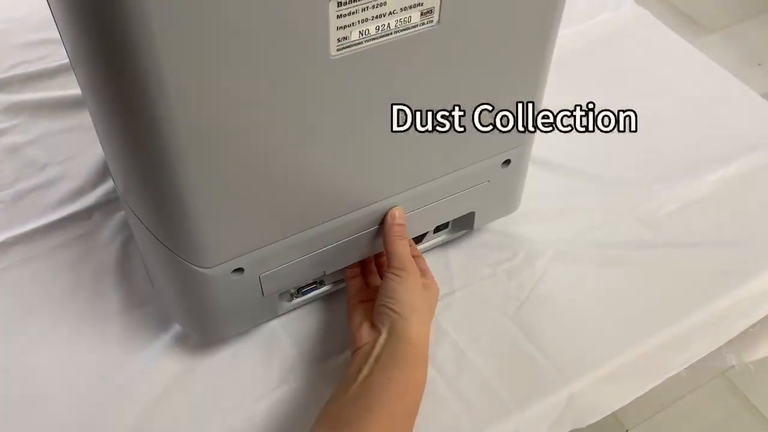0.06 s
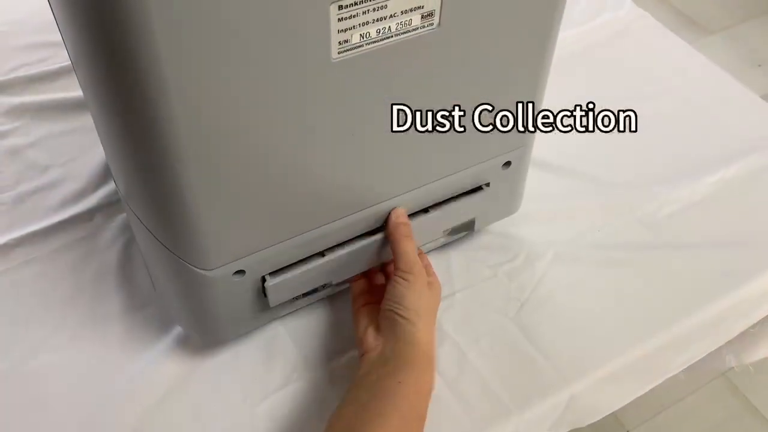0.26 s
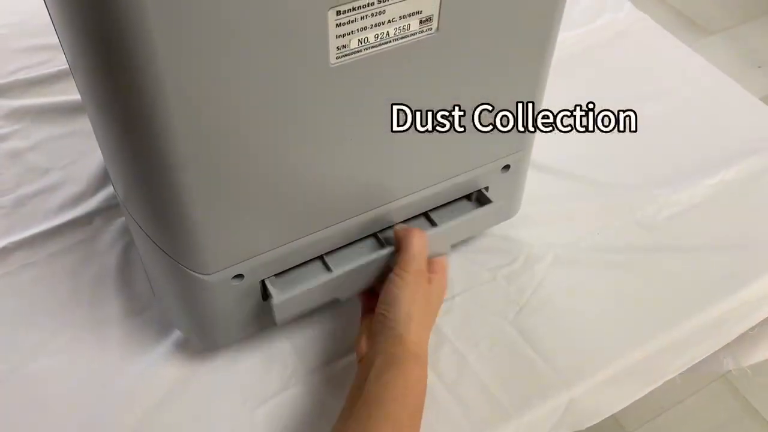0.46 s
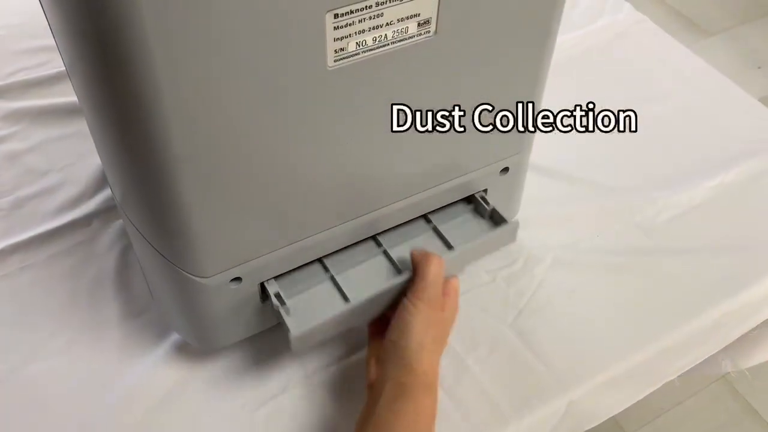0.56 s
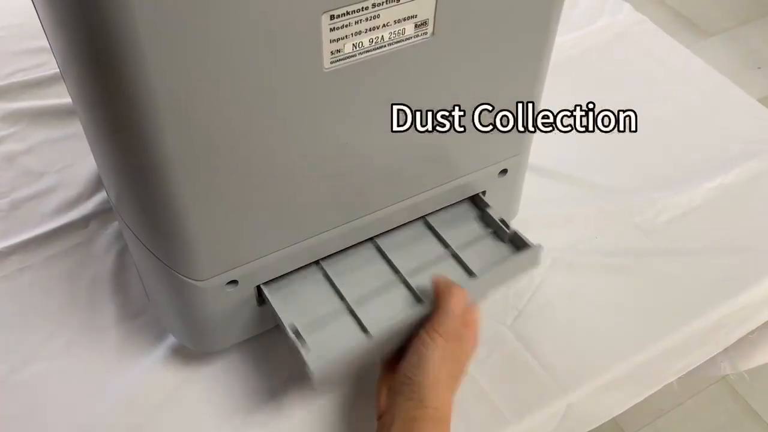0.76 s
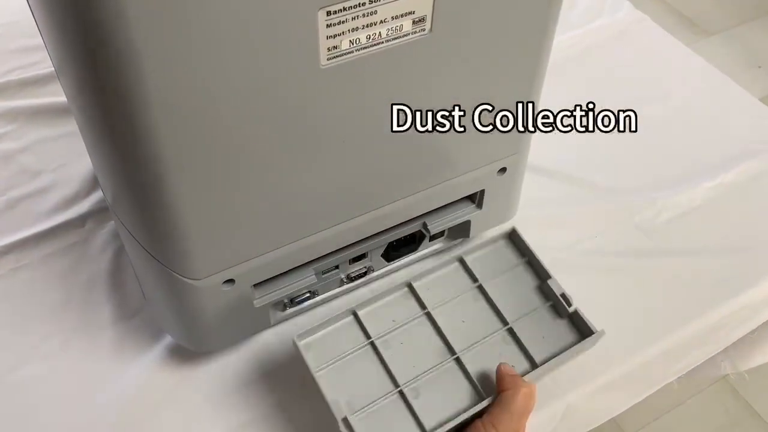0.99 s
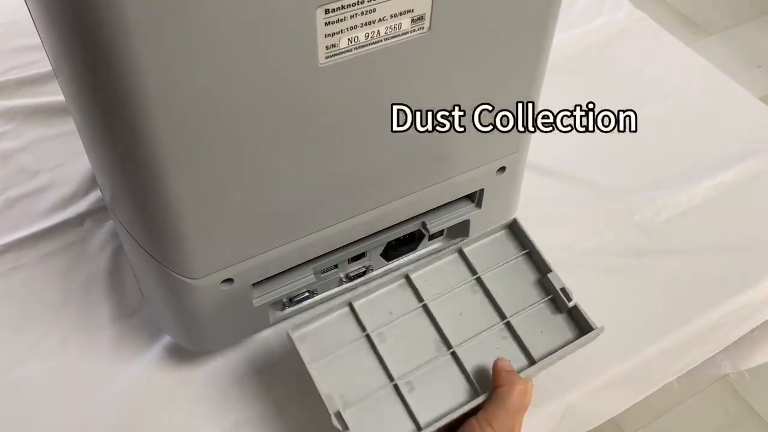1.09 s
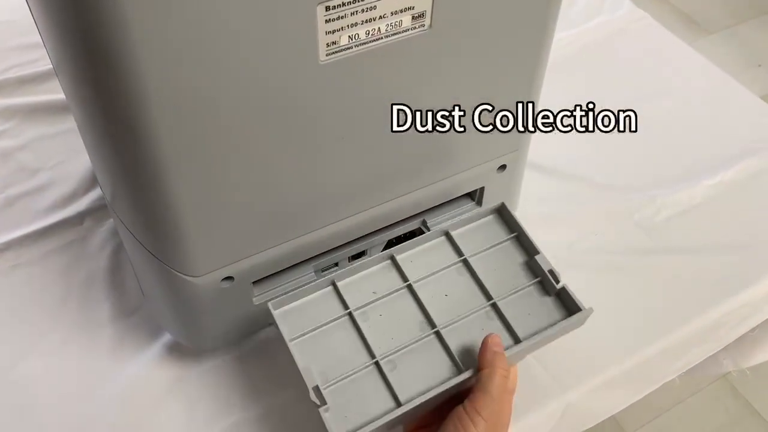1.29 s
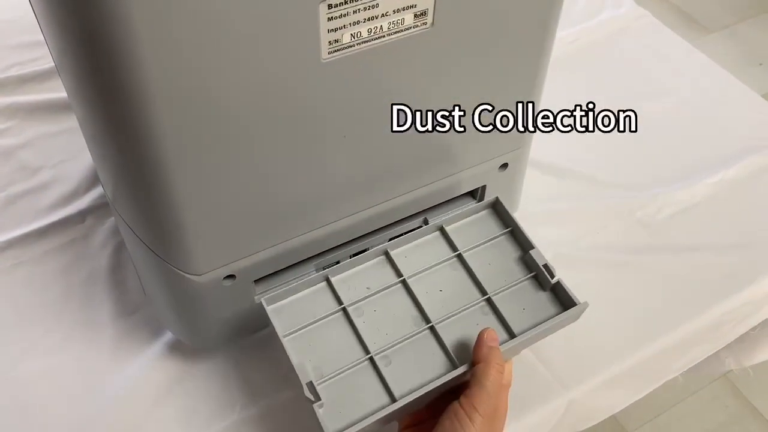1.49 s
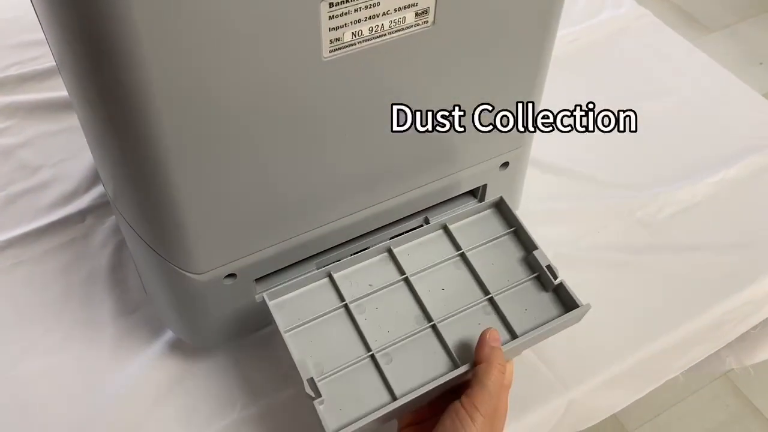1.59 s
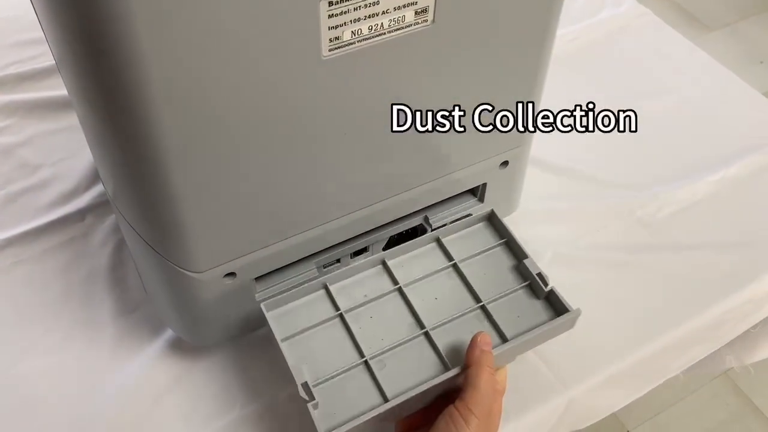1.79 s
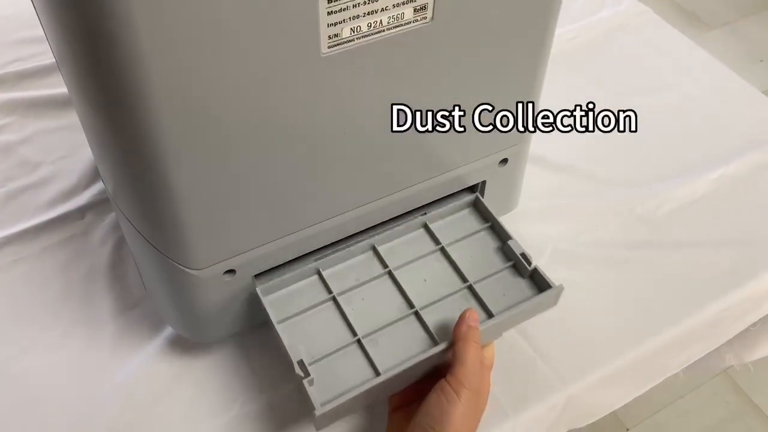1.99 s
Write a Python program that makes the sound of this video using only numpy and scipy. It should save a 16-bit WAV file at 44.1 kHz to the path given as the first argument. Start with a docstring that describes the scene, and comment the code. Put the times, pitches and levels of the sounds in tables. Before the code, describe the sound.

In a quiet room, one microphone picks up a plastic tray clicking free and scraping along its guides with a few hollow knocks. Light ticks and a soft bump follow over a low ventilation rumble.

```python
"""A ribbed plastic tray is drawn out of a machine's base, heard on one microphone in a quiet room.
Ventilation rumbles from the start. At 0.2 s the catch snaps; the tray then knocks and scrapes along
its guides, and the shell's resonances shift as it travels. Free by 0.8 s, it ticks lightly in the hand,
each contact trailed by a short room tail. At 1.5 s comes one soft low bump, then only the ventilation."""
import sys
import numpy as np
from scipy import signal
from scipy.fft import rfft, irfft
from scipy.io import wavfile

SR = 44100
rng = np.random.default_rng(int(sys.argv[2]) if len(sys.argv) > 2 else 0)


def unload_wav(signal):
    """Save mono or channel-first audio to the path in sys.argv[1] as 16-bit WAV at rate SR, clipped to [-1, 1]."""
    wavfile.write(
        sys.argv[1],
        SR,
        np.round(np.clip(np.atleast_2d(signal).T, -1, 1) * 32767).astype(np.int16),
    )


N = 90404
TIME, FREQS_HZ = np.arange(N) / SR, np.fft.rfftfreq(N, 1 / SR)
BAND_EDGES_HZ = 70 * 2 ** np.arange(0, 7.9, 1 / 3)
PIVOT_HZ = 1000  # brightness tilts turn about this pitch
LATCHED_S, HALF_OUT_S, AT_LIP_S = 0.29, 0.41, 0.76  # the tray's travel

# tray striking the housing: start_s, level_db, tilt_db_per_octave, ring_ratio, spot_hz, spot_db
KNOCKS = [(0.2209, -15.5, 1.5, 1.0, 2300, -27.5), (0.2244, -9.5, -2.5, 1.2, 710, -25),
          (0.2297, -7, 1.22, 0.67, 4430, -17.5), (.2322, -6, 0, 0.62, 750, -24.5),
          (0.247, -15, -1, 0.77, 209, -32), (0.262, -16, 0, 0.57, 1080, -23),
          (0.4166, -14.5, -0.5, 0.54, 690, -30), (0.434, -21.5, -6.5, 3.3, 725, -28),
          (0.443, -30, -9.5, 1.1, 1080, -37), (0.4544, -13, -1, 0.68, 1040, -39),
          (0.7367, -27, 2.5, 1.1, 880, -34), (0.7590, -14, 0.5, 0.7, 1130, -23.5),
          (0.7723, -23.5, -5, 1.2, 4150, -32), (0.7831, -29, 4, 0.7, 1420, -36),
          (0.7936, -20, -3.5, 1, 1890, -27.5), (0.803, -25, 1, 1.9, 270, -38.5)]
# dense resonances of tray and housing: pitch_hz, density_db, t60_s
KNOCK_BODY = [(86, -17.5, 0.41), (169, 1.5, 0.27), (350, 4.5, 0.043), (497, 1.5, 0.018), (686, 9, 0.031),
              (967, -10, 0.16), (1425, 7.5, 0.011), (1870, -14, 0.093), (2740, -1, 0.021),
              (3500, -12, 0.17), (4860, -12, 0.026), (6990, -13.5, 0.048), (8420, -25, 0.028),
              (12350, -13.5, 0.029), (14800, -65, 0.019)]
# tray modes that stand out: pitch_hz, level_db, t60_s
TRAY_MODES = [(172, -30.5, 0.042), (309.3, -36.5, 0.19), (388, -32, 0.048), (678, -41.5, 0.063),
              (719, -25, 0.052), (752, -25.5, 0.052), (900, -30.5, 0.039), (1056, -37, 0.059),
              (1290, -34.5, 0.043), (1420, -38.5, 0.05), (1560, -34.5, 0.057), (2690, -42, 0.065),
              (3050, -31.5, 0.018), (4510, -30, 0.018)]
# tray sliding on its guides: start_s, end_s, level_db, tilt_db_per_octave, rumble_db, attack_s
SCRAPES = [(0.408, 0.471, -46, -1, -53.5, 0.0083), (0.471, 0.557, -54, 0, -61, 0.014),
           (0.52, 0.744, -72, 8, -67, 0.0078), (0.594, 0.654, -55, -3.5, -79, 0.023),
           (0.663, 0.732, -52.5, -8, -72, 0.047), (0.719, 0.772, -43, -1.3, -67, 0.026),
           (0.761, 0.795, -42.5, 0.2, -58, 0.008), (0.794, 0.809, -41, 1, -49, 0.0058)]
# spectrum of the sliding friction: pitch_hz, density_db
SCRAPE_COLOUR = [(100, -40), (250, 0.5), (500, -2.5), (750, 6), (1400, -3), (2000, -5), (2900, -13.5),
                 (4300, -13), (5500, -10.5), (8500, -25), (11000, -17.5), (13000, -27.5)]
# shell's peaks and dips at three tray positions: centre_hz, width_hz, boost_db
SHELL_LATCHED = [(722, 140, 2), (930, 160, 5.5), (1450, 174, 4), (1880, 186, 1.5), (2190, 97, 4.5),
                 (2900, 400, 4.5), (3810, 250, 1), (4620, 530, 5.5), (5750, 760, 5.5), (7200, 490, 6.5)]
SHELL_HALF_OUT = [(537, 72, -12), (740, 110, 2), (1070, 76, 7), (1580, 70, 4), (1820, 240, -3),
                  (2370, 120, 5.5), (2720, 210, 4.5), (5330, 560, -8), (6350, 300, 6.5), (7400, 550, 6),
                  (9000, 900, 5.5)]
SHELL_AT_LIP = [(570, 310, -3), (1170, 50, 3), (1600, 170, 5), (2367, 58, 8), (2870, 150, 8), (3004, 77, 8),
                (4030, 290, 9.5), (4500, 350, 1.5), (5550, 160, 4), (6080, 330, 5), (7280, 410, 8),
                (9150, 350, 4.5)]
# tray ticking in the hand: start_s, level_db, tilt_db_per_octave, pitch_ratio, ping_hz
TICKS = [(.659, -44.5, 4, 1, 5440), (0.6856, -46.5, 6.5, 1, 7440), (0.7068, -46.5, 7, 1, 6300),
         (.902, -42, 4, 0.95, 5560), (0.9223, -30.5, 4, 0.9, 3200), (0.9660, -21, 1.8, 0.95, 4100),
         (0.968, -34.5, 5.5, 1, 3160), (1.0379, -25.5, 2.1, 0.9, 4780), (1.161, -57.5, 6.5, 0.98, 6240),
         (1.181, -55, 4, 1, 5200)]
# resonances of the held tray: pitch_hz, density_db, t60_s
TICK_BODY = [(289, 2, 0.012), (640, 2, 0.017), (830, 12, 0.01), (1080, 9.5, 0.0094), (1390, -11, 0.0096),
             (1880, -7, 0.032), (2900, -11.5, 0.077), (5460, -11.5, 0.019), (8000, -22.5, 0.012),
             (10400, -18.5, 0.012), (14000, -31, 0.0084)]
# room tail against the direct sound at the microphone: pitch_hz, level_db, t60_s
ROOM_TAIL = [(102, 3.5, 0.5), (393, -8, 0.42), (648, -9.5, 0.35), (1048, -10.5, 0.26), (2913, -7, 0.47),
             (5730, -12, 0.44), (8930, -7.5, .31), (12300, -17, 0.36)]
# spectrum of the ventilation: pitch_hz, density_db
VENT_AIR = [(21, -44.5), (35, -5.5), (87, 0.5), (147, -2), (198, -3), (247, -11.5), (317, -7.5), (386, -17),
            (416, -19), (483, -18.5), (773, -22.5), (853, -25.5), (966, -24.5), (2130, -33), (2800, -35.5),
            (6340, -47), (8120, -54.5), (10100, -59), (13000, -66.5)]
# hum of the ventilation: pitch_hz, level_db
VENT_HUM = [(98, -65.5), (129, -65.5), (389, -68)]


def knocks(body_db=9, modes_db=-3, spot_cycles=9):
    """The catch snaps, the tray hits its guides; each spot has its pitch, firm contacts damp the ring."""
    out = np.zeros(N)
    for start_s, level_db, tilt_db, ring_ratio, spot_hz, spot_db in KNOCKS:
        body = from_db(body_db) * dense_ring(np.array(KNOCK_BODY) * [1, 1, ring_ratio], tilt_db)
        modes = from_db(modes_db) * tray_modes(tilt_db)
        spot = from_db(spot_db) * ping(spot_hz, spot_cycles / spot_hz)
        add(out, start_s, from_db(level_db) * (body + modes) + spot)
    return out


def scrapes(slips_per_s=11000, slip_spread_db=2.2, release_s=0.0051, modes_db=-19):
    """Dense tiny slips shake the tray while it slides, and the housing rumbles."""
    out = np.zeros(N)
    for start_s, end_s, level_db, tilt_db, rumble_db, attack_s in SCRAPES:
        slips = (rng.random(N) < slips_per_s / SR) * rng.choice([-1, 1], N)
        slips = slips * from_db(slip_spread_db * np.minimum(rng.exponential(1, N), 4))
        colour_db = at_hz(SCRAPE_COLOUR, FREQS_HZ) + tilt(tilt_db, np.maximum(FREQS_HZ, 100))
        grit = filtered(slips, from_db(colour_db))
        rumble = narrow_band(slips, centre_hz=151, width_hz=71)
        attack = np.clip((TIME - start_s) / attack_s, 0, 1)
        stroke = attack * np.exp(-np.maximum(TIME - end_s, 0) / release_s)
        ringing = from_db(modes_db) * signal.fftconvolve(stroke * slips, tray_modes(tilt_db))[:N]
        out += from_db(level_db) * (stroke * grit + ringing) / grit.std()
        out += from_db(rumble_db) * stroke * rumble
    return out


def tray_modes(tilt_db, spread_db=2):
    """The tray's clear modes ring with a new strength and sign at each contact."""
    out = 0
    for hz, level_db, t60_s in TRAY_MODES:
        strength = from_db(level_db + tilt(tilt_db, hz) + spread_db * rng.standard_normal())
        out += strength * rng.choice([-1, 1]) * ping(hz, t60_s)
    return out


def shell(contacts):
    """The shell's resonances crossfade through three colours as the tray leaves its slot."""
    out = np.zeros(N)
    for table, position in zip((SHELL_LATCHED, SHELL_HALF_OUT, SHELL_AT_LIP), np.eye(3)):
        fade = np.interp(TIME, [LATCHED_S, HALF_OUT_S, AT_LIP_S], position)
        bells = [1 + (from_db(db) - 1) / (1 + 2j * (FREQS_HZ - hz) / width) for hz, width, db in table]
        out += filtered(contacts * fade, np.prod(bells, axis=0))
    return out


def ticks(body_db=6, ping_db=-29.5):
    """The tray ticks in the hand: a hollow tap with a small high ping."""
    out = np.zeros(N)
    for start_s, level_db, tilt_db, pitch_ratio, ping_hz in TICKS:
        tap = from_db(body_db) * dense_ring(np.array(TICK_BODY) * [pitch_ratio, 1, 1], tilt_db)
        high = from_db(ping_db + tilt(tilt_db, ping_hz)) * ping(ping_hz, t60_s=0.012)
        add(out, start_s, from_db(level_db) * (tap + high))
    return out


def bump(peak_s=1.549, pitch_hz=53.6, level_db=-35, width_s=0.0098):
    """A soft, low handling bump of a few cycles."""
    t = TIME - peak_s
    return from_db(level_db) * np.exp(-np.abs(t) / width_s) * np.cos(2 * np.pi * pitch_hz * t)


def room_tail(sound):
    """The room's reflections reach the microphone and die within about half a second."""
    return signal.fftconvolve(sound, dense_ring(ROOM_TAIL, build_s=0.0034, size=26000))[:N]


def ventilation(air_db=-51.5, hum_width_hz=17.7):
    """Room tone: a steady rumble of air, with narrow noise bands as a faint wavering hum."""
    air = rms_one(filtered(rng.standard_normal(N), from_db(at_hz(VENT_AIR, FREQS_HZ))))
    hum = sum(from_db(db) * narrow_band(rng.standard_normal(N), hz, hum_width_hz) for hz, db in VENT_HUM)
    return from_db(air_db) * air + hum


def dense_ring(table, tilt_db=0, build_s=0.000067, size=9000):
    """Many close resonances: third-octave noise bands, each dying at its own rate."""
    t, out = TIME[:size], np.zeros(size)
    onset = 1 - np.exp(-t / build_s)
    for low, high in zip(BAND_EDGES_HZ, BAND_EDGES_HZ[1:]):
        hz = np.sqrt(low * high)
        decay = from_db(-60 * t / at_hz(table, hz, column=2))
        burst = rng.standard_normal(size) * decay * onset
        band = signal.sosfilt(signal.butter(2, [low, high], "band", fs=SR, output="sos"), burst + 1e-18)
        unit_density = rms_one(band) * np.sqrt(2 * (high - low) / SR / size)
        out += unit_density * from_db(at_hz(table, hz) + tilt(tilt_db, hz))
    return out


def ping(hz, t60_s, size=9000):
    """One dying sine of height 1."""
    t = TIME[:size]
    return np.exp(-np.log(1000) * t / t60_s) * np.sin(2 * np.pi * hz * t)


def narrow_band(x, centre_hz, width_hz):
    """Pass a sound through one bell-shaped resonance, at rms 1."""
    return rms_one(filtered(x, 1 / (1 + (2 * (FREQS_HZ - centre_hz) / width_hz) ** 2)))


def filtered(x, response):
    """Apply a gain at each frequency."""
    return irfft(rfft(x) * response, N)


def tilt(db_per_octave, hz):
    """Decibels that a brightness slope adds at this pitch."""
    return db_per_octave * np.log2(hz / PIVOT_HZ)


def from_db(db):
    """Decibels to gain."""
    return 10 ** (np.asarray(db) / 20)


def rms_one(x):
    """Scale to rms 1."""
    return x / np.sqrt(np.mean(x ** 2) + 1e-20)


def at_hz(table, hz, column=1):
    """Read a table column on a log-frequency axis."""
    table = np.array(table)
    return np.interp(np.log(hz + 1e-9), np.log(table[:, 0]), table[:, column])


def add(out, start_s, sound):
    """Mix a sound in from start_s."""
    start = max(int(start_s * SR), 0)
    out[start:start + len(sound)] += sound[:N - start]


def scene(shell_share=0.34):
    """At the microphone: the tray direct, its room tail, the bump and the ventilation."""
    contacts, taps = knocks() + scrapes(), ticks()
    direct = shell(contacts)
    # only part of the shell's colour survives in the room tail
    diffuse = shell_share * direct + (1 - shell_share) * contacts + taps
    return (direct + taps + room_tail(diffuse) + bump() + ventilation())[None]


def record(dry, low_cut_hz=36, high_cut_hz=12900):
    """The microphone loses the deepest bass; the top is cut steeply."""
    thin = signal.sosfilt(signal.butter(2, low_cut_hz, "high", fs=SR, output="sos"), dry)
    return signal.sosfilt(signal.ellip(8, .2, 80, high_cut_hz, fs=SR, output="sos"), thin)


dry = scene()
out = record(dry)
unload_wav(out)
```